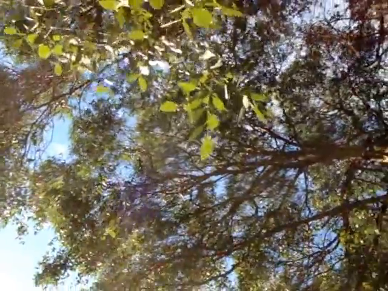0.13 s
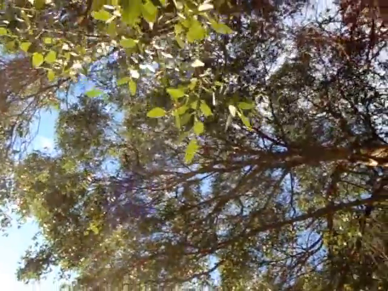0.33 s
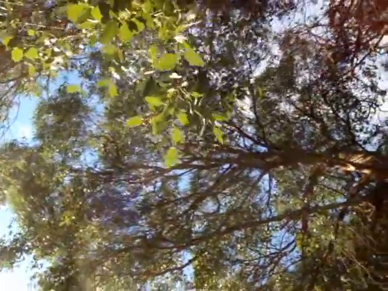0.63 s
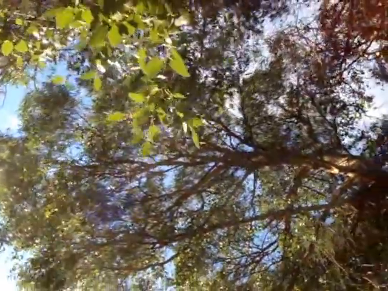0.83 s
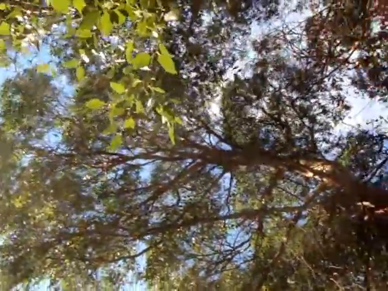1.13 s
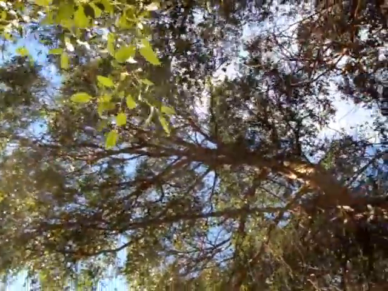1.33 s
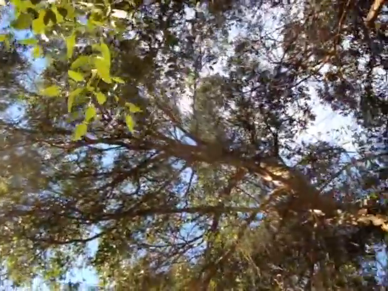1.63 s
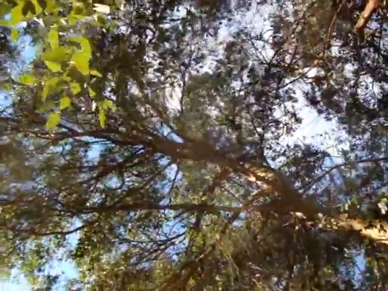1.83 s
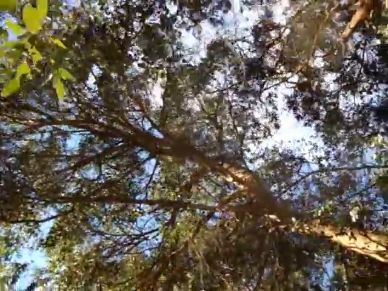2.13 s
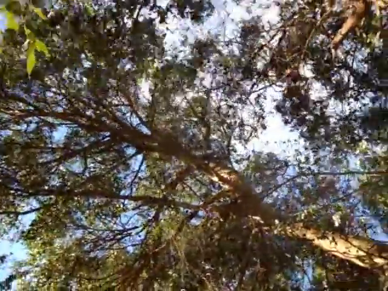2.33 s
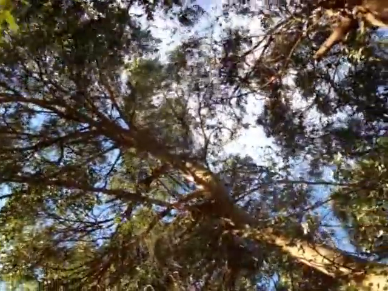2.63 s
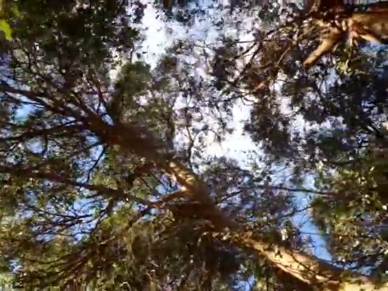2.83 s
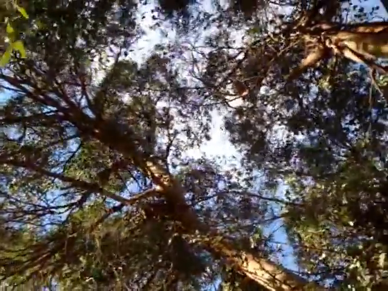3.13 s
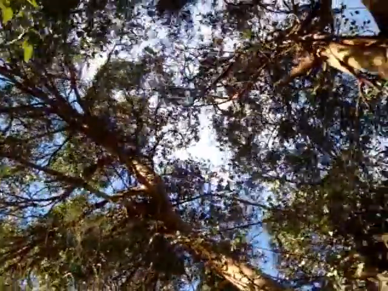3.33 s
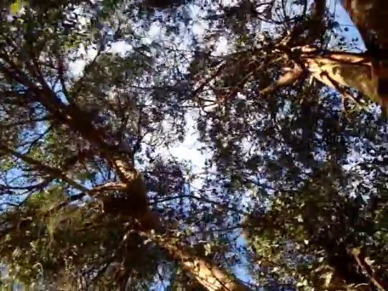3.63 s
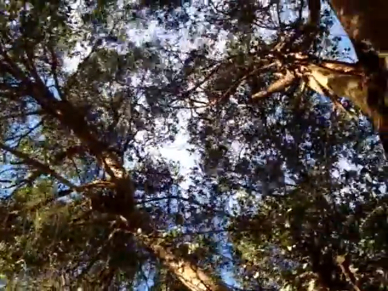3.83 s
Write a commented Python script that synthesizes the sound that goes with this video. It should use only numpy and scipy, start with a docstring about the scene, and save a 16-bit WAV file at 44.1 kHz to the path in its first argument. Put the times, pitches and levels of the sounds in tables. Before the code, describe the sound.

Wind rushing and hissing through leafy treetops, building then easing slightly, with microphone rumble and faint bird chirps

```python
"""A gust builds in tall trees, then eases: the crowns roar and countless leaves hiss and patter, all shaped noise.
Eddies reach the microphone as low turbulent noise and swings of pressure: a spell of buffeting, then soft thumps.
A distant bird whistles and chirps in gliding tones that echo among the trunks.
A few twigs tick in short bursts of noise. The sound is mono."""
import sys
import numpy as np
from scipy import signal
from scipy.fft import rfft, irfft
from scipy.io import wavfile
from scipy.ndimage import uniform_filter1d

SR = 44100
rng = np.random.default_rng(int(sys.argv[2]) if len(sys.argv) > 2 else 0)


def file_out(sig):
    """Save sig as 16-bit WAV at sys.argv[1]."""
    # one column per channel
    cols = np.atleast_2d(sig).T
    # limit, then scale
    lim = np.clip(cols, -1, 1)
    pcm = np.round(lim * 32767).astype(np.int16)
    wavfile.write(sys.argv[1], SR, pcm)


N = 176400  # 4 s

TWIG_ATTACK_S = .001
# bird: pitch swing of the roughest note as a share of its pitch, its rate, and the echo from the trunks
WARBLE_SHARE, WARBLE_PER_S, ECHO_T60_S, ECHO_DB = .03, 450, .28, -5
LOW_CUT_HZ = 50  # the microphone passes little below this
BUFFET_FLICKER_DB, BUFFET_FLICKER_PER_S = 2, 70
SWIRL_DB, SWIRL_S = -19, .015  # rough air around each eddy: level against its peak, and spread in time
SWAY_DB, FLUTTER_DB = 0.68, .5
# levels hold where the gust stands at 0 dB; a gust power is the dB of change for each dB of gust
ROAR_DB, ROAR_GUST_POWER = -40.0, 0.79
LEAVES_DB, LEAVES_GUST_POWER = -35.5, 1.0
PATTER_PER_S, PATTER_DB, PATTER_SPREAD_DB = 1500, -45.5, 3.0
SHEEN_HZ, SHEEN_GUST_POWER = 7500, 0.24  # the top treble grows faster with the gust
TOP_HZ = 10080


def undb(db):
    """Decibels to gain."""
    return 10 ** (np.asarray(db) / 20)


def unit(x):
    """Scale to rms 1."""
    return x / np.sqrt(np.mean(x ** 2) + 1e-20)


def clock():
    """Time of every sample, in seconds."""
    return np.arange(N) / SR


def curve(rows):
    """Join (seconds, value) rows by straight lines."""
    return np.interp(clock(), *np.array(rows).T)


def octaves():
    """Log frequency of every spectral bin, in octaves above 1 Hz."""
    return np.log2(np.maximum(np.arange(N // 2 + 1) * SR / N, 1))


def colour(x, points):
    """Filter by (Hz, dB) points, to rms 1."""
    hz, db = np.array(points).T
    gain = undb(np.interp(octaves(), np.log2(hz), db))
    return unit(irfft(rfft(x) * gain, N))


def walk(rate):
    """Smooth random motion with spread near 1, taking a new random step `rate` times a second."""
    k = max(int(SR / rate), 2)
    steps = np.repeat(rng.standard_normal(N // k + 2), k)
    smooth = uniform_filter1d(uniform_filter1d(steps, k), k)
    return 1.3 * smooth[k // 2:k // 2 + N]


def restless(x):
    """Each half octave sways slowly and flutters quickly, as branches move on their own."""
    spectrum = rfft(x)
    place = np.clip(2 * (octaves() - 8), 0, 11)  # half octaves above 256 Hz
    out = 0
    for k in range(12):
        band = irfft(spectrum * np.maximum(1 - abs(place - k), 0), N)
        out = out + band * undb(SWAY_DB * walk(3.08) + FLUTTER_DB * walk(18))
    return out


def twigs():
    """Twigs knock together: short dry ticks of band noise with a fast attack and decay."""
    # Each row: start in seconds, peak rms level in dB, centre in Hz, width in octaves, decay in seconds.
    ticks = [(.066, -36.5, 5950, .1, 0.0018), (.303, -43.5, 2500, .7, .006),
             (0.8327, -35, 2400, 0.61, 0.0043), (.991, -40, 3000, 0.52, .005),
             (2.475, -31.5, 2200, 0.75, .005), (2.692, -36, 3400, .5, .004), (3.279, -34, 7100, 0.4, .005)]
    out = np.zeros(N)
    for at, db, hz, width, decay in ticks:
        age = np.maximum(clock() - at, 0)
        band = np.exp(-.5 * ((octaves() - np.log2(hz)) / width) ** 2)
        crack = unit(irfft(rfft(rng.standard_normal(N)) * band, N))
        shape = (1 - np.exp(-age / TWIG_ATTACK_S)) * np.exp(-age / decay)
        out += undb(db) * crack * shape / shape.max()
    return out


def bird():
    """Distant gliding, warbling whistles, smeared by echoes from the trunks."""
    # Each row: start in seconds, length in seconds, first pitch in Hz, last pitch in Hz,
    # level of the direct note in dB, roughness from 0 to 1.
    notes = [(.465, .075, 3460, 3490, -45.5, .8), (0.564, 0.097, 3575, 3580, -41, 0.15),
             (0.653, 0.043, 3550, 3470, -44, .4), (.845, 0.084, 3930, 3910, -49.5, .7),
             (0.909, 0.031, 3400, 3460, -51, 0.3), (2.485, 0.073, 3820, 4060, -43.5, .8),
             (3.033, .085, 3870, 4190, -42.5, .8)]
    t, song = clock(), np.zeros(N)
    for at, length, first_hz, last_hz, db, rough in notes:
        u = np.clip((t - at) / length, 0, 1)  # progress through the note
        glide = first_hz + (last_hz - first_hz) * u
        hz = glide * (1 + WARBLE_SHARE * rough * walk(WARBLE_PER_S))
        swell = np.sqrt(2 * abs(np.sin(np.pi * u)))
        song += undb(db) * swell * np.sin(2 * np.pi * np.cumsum(hz) / SR)
    trunks = rng.standard_normal(N) * np.exp(-np.log(1000) * t / ECHO_T60_S)
    echo = signal.fftconvolve(song, trunks / np.linalg.norm(trunks))[:N]
    return song + undb(ECHO_DB) * echo


def microphone_wind():
    """Fitful low turbulence; each strong eddy is one swing of pressure wrapped in a short swirl."""
    # Turbulence at the microphone between eddies. Each row: time in seconds, level in dB.
    buffet = [(0, -90), (.9, -76), (1.08, -45), (1.36, -38), (1.46, -31.5), (1.59, -31.5), (1.73, -30),
              (1.91, -32), (2.06, -53), (2.15, -43), (2.22, -58), (2.38, -54), (2.56, -58), (3.1, -50),
              (3.5, -63), (3.75, -56), (3.89, -44), (4.0, -47)]
    # Colour of the turbulence. Each row: frequency in Hz, relative level in dB per Hz.
    buffet_colour = [(20, -24), (50, -14), (90, -6), (140, -2), (220, 1.5), (330, -5), (480, -13),
                     (800, -26), (1600, -54)]
    # Single eddies that hit the microphone. Each row: time of mid-swing in seconds,
    # peak in dB ahead of the low cut, centre in Hz, sign of the pressure swing.
    eddies = [(1.0785, -29.5, 250, 1), (1.231, -28, 190, -1), (1.2752, -24.5, 250, 1),
              (1.294, -19.5, 180, 1), (1.5233, -19, 222, 1), (1.7146, -15.5, 220, -1),
              (1.7433, -18.5, 150, 1), (1.8133, -13.5, 260, 1), (1.832, -19, 210, 1),
              (1.8552, -20.5, 220, 1), (1.923, -22, 240, -1), (2.005, -30, 159, -1), (2.1101, -35, 170, -1),
              (2.1299, -32, 150, -1), (2.1687, -33, 160, 1), (2.6837, -30.5, 139, 1), (2.7829, -27, 150, 1),
              (2.8752, -24.5, 112, -1), (2.8856, -26, 120, -1), (3.041, -32, 135, 1),
              (3.1205, -29, 170, -1), (3.309, -29.5, 97, -1), (3.6803, -34, 140, -1),
              (3.6953, -29.5, 160, 1), (3.8169, -19.5, 183, -1), (3.8662, -15, 275, -1),
              (3.8904, -29, 165, 1), (3.9262, -23, 160, -1)]
    swings, strength = 0, undb(curve(buffet))
    for at, db, hz, sign in eddies:
        age = clock() - at
        u = 2 * np.pi * hz * age
        swings = swings - np.sign(sign) * undb(db) * u * np.exp((1 - u ** 2) / 2)
        swirl = undb(db + SWIRL_DB) * np.exp(-abs(age) / SWIRL_S)
        strength = np.maximum(strength, swirl)
    flicker = undb(BUFFET_FLICKER_DB * walk(BUFFET_FLICKER_PER_S))
    churn = unit(colour(rng.standard_normal(N), buffet_colour) * flicker)
    low_cut = signal.butter(1, LOW_CUT_HZ, "high", fs=SR, output="sos")
    return signal.sosfiltfilt(low_cut, swings + strength * churn)


def crowns(gust_db):
    """Air roars through distant branches: coloured noise that rises with the gust."""
    # Colour of the roar. Each row: frequency in Hz, relative level in dB per Hz.
    roar = [(25, -32), (60, -19.5), (120, -13.5), (200, -7.5), (350, -1.5), (750, 0), (1100, -2.5),
            (1600, -8.5), (3000, -19), (8000, -43)]
    noise = restless(colour(rng.standard_normal(N), roar))
    return noise * undb(ROAR_DB + ROAR_GUST_POWER * gust_db)


def leaves(gust_db):
    """Far leaves merge into a hiss, near ones patter; both brighten with the gust."""
    # Colour of hiss and patter. Each row: frequency in Hz, relative level in dB per Hz.
    leaf_colour = [(400, -17.5), (1000, -8.5), (1800, -1), (2800, 0.5), (4500, -0.7), (6500, -.5),
                   (8300, -1), (10000, -5)]
    hiss = restless(colour(rng.standard_normal(N), leaf_colour))
    # single touches come more often as the gust grows
    touches = rng.random(N) < PATTER_PER_S * undb(gust_db / 2) / SR
    sizes = undb(PATTER_SPREAD_DB * np.minimum(rng.exponential(size=N), 5))
    patter = colour(touches * sizes * rng.standard_normal(N), leaf_colour)
    rustle = undb(LEAVES_DB) * hiss + undb(PATTER_DB) * patter
    rustle = rustle * undb(LEAVES_GUST_POWER * gust_db)
    treble = (1 + np.tanh(6 * (octaves() - np.log2(SHEEN_HZ)))) / 2
    sheen = irfft(rfft(rustle) * treble, N)
    return rustle + sheen * (undb(SHEEN_GUST_POWER * gust_db) - 1)


def scene():
    """One gust drives crowns and leaves; both channels carry the same sound."""
    # Strength of the gust in the crowns. Each row: time in seconds, level in dB.
    gust = [(0, -10.5), (.5, -8.5), (1.0, -6.5), (1.5, -4.5), (2.0, -2), (2.35, -0.35), (2.9, -0.7),
            (3.4, -1.37), (4.0, -2.5)]
    gust_db = curve(gust)
    mono = twigs() + bird() + microphone_wind() + crowns(gust_db) + leaves(gust_db)
    return np.array([mono, mono])


def record(dry):
    """The recorder cuts the top steeply."""
    top_cut = signal.ellip(12, .1, 75, TOP_HZ, fs=SR, output="sos")
    return signal.sosfilt(top_cut, dry)


dry = scene()
out = record(dry)
file_out(out)
```